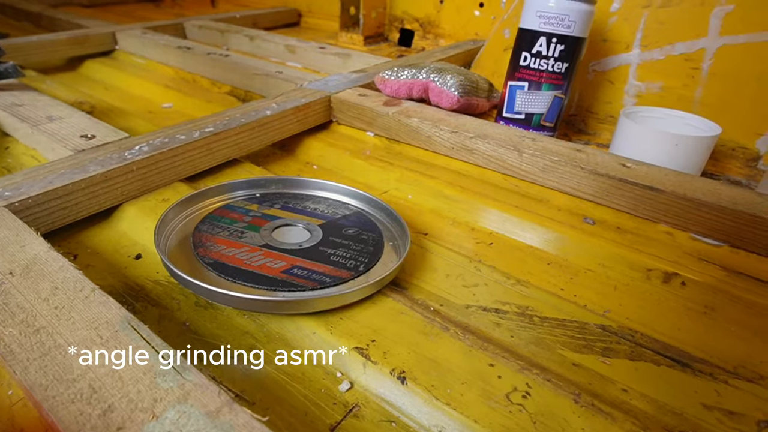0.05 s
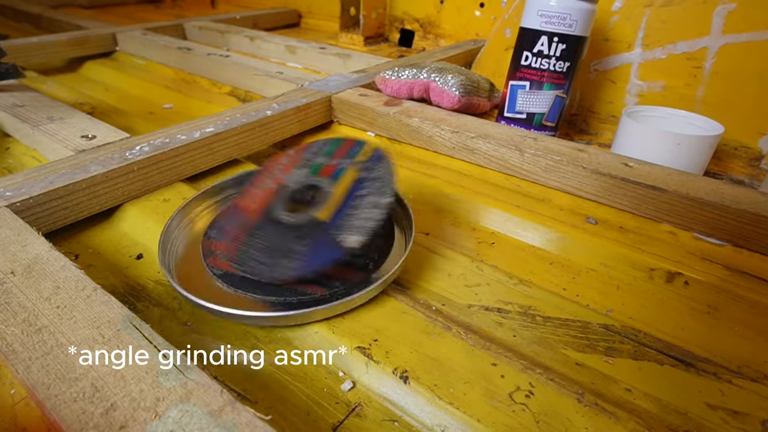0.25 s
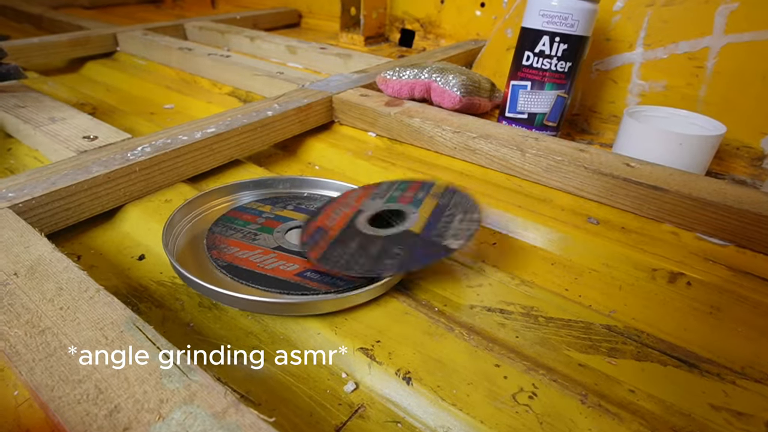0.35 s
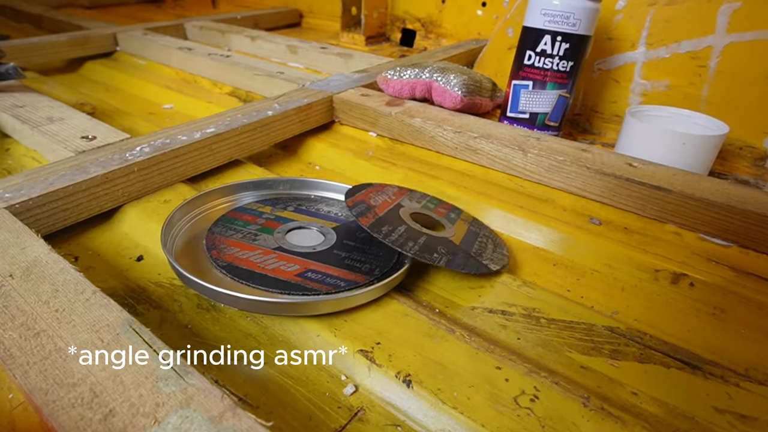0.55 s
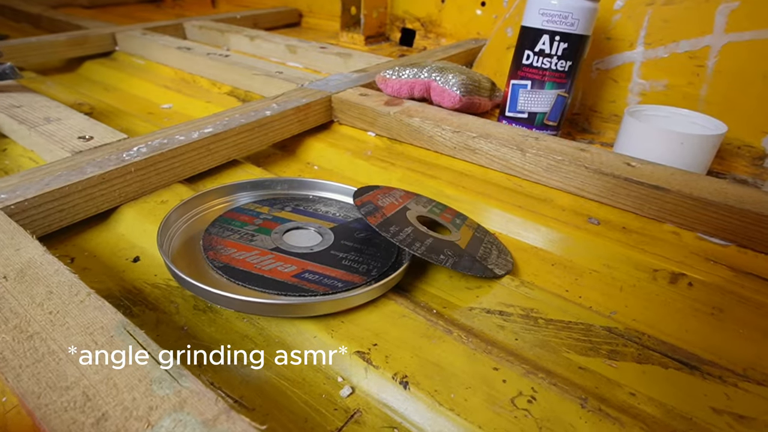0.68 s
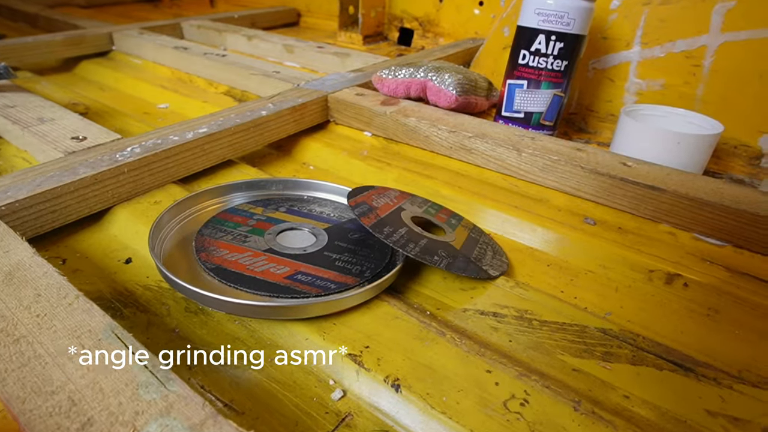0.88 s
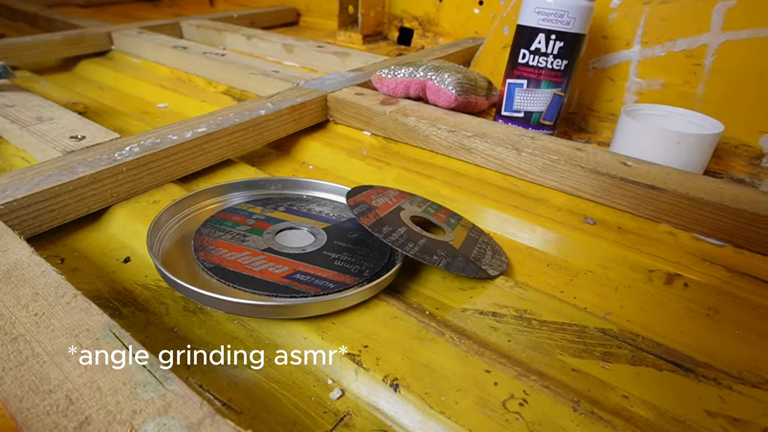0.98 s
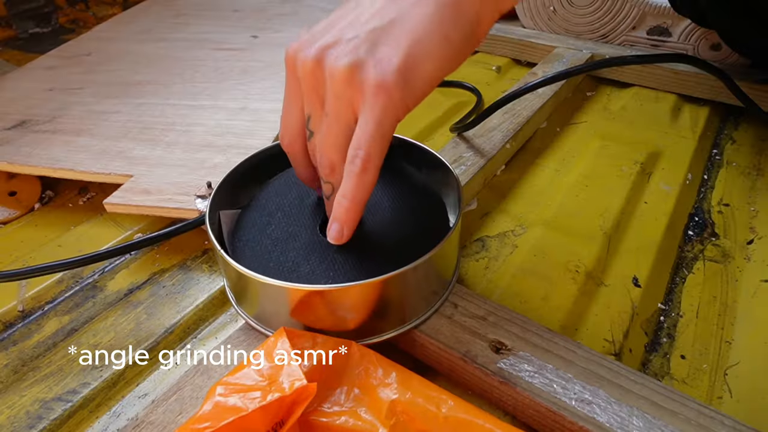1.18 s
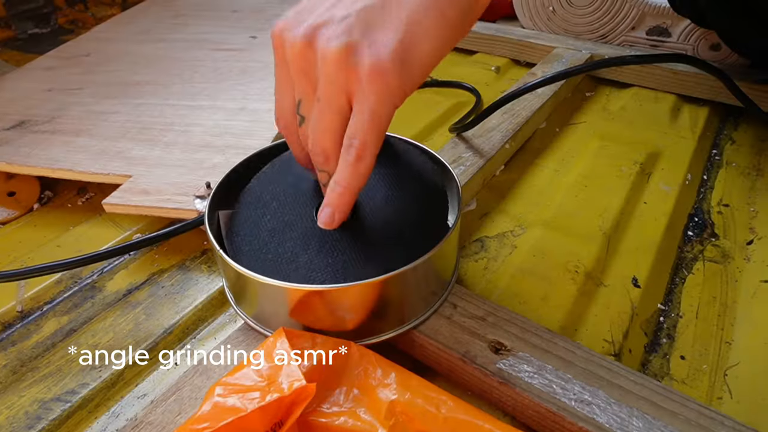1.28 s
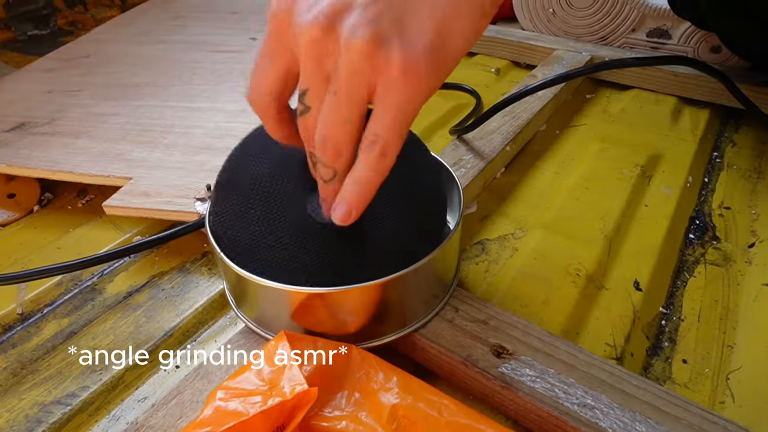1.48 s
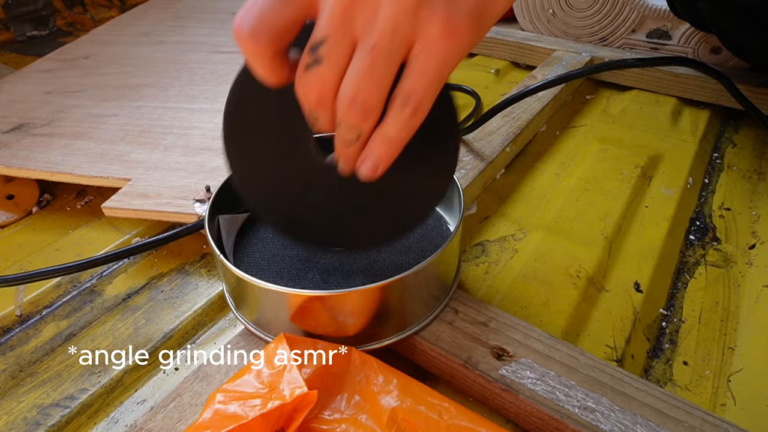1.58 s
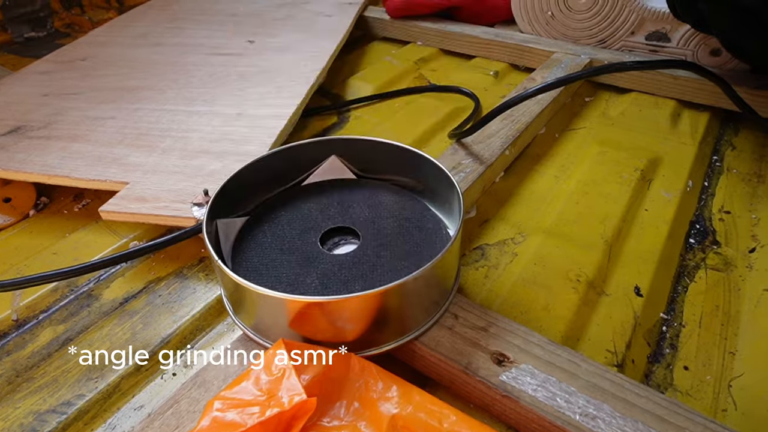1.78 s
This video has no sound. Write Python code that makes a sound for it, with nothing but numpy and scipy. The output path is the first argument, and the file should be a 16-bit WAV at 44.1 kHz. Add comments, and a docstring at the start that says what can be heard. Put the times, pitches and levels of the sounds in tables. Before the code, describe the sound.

Metallic clatter of a disc bouncing on a tin lid, followed by clacks and knocks.

```python
"""Grinding discs and tins in a van

Inside the van, microphone close. A grinding disc lands on a tin lid, bounces and rattles to rest on the
metal floor. After a soft scuff a hand works another disc in a deep tin: its rim squeaks along the wall,
it clacks down, and the tin knocks on a wooden batten. Low rumble and hiss lie behind it all.
The microphone's limiter flattens the hardest blows."""
import sys
import numpy as np
from scipy import signal
from scipy.fft import rfft, irfft, next_fast_len
from scipy.io import wavfile
from scipy.ndimage import map_coordinates

SR = 44100
rng = np.random.default_rng(int(sys.argv[2]) if len(sys.argv) > 2 else 0)


def int16_out(signal):
    """Quantize to a 16-bit WAV file."""
    q = np.round(np.clip(np.atleast_2d(signal).T, -1, 1) * 32767)
    wavfile.write(sys.argv[1], SR, q.astype(np.int16))


N = 81585
AGE = np.arange(SR // 2) / SR  # seconds since a contact

# the disc's contacts with the lid (t/s, ring level/dB, crack level/dB, tilt/dB per octave)
LID_CONTACTS = [(0.2147, -37, -5, 1), (0.223, -10.5, -17, 6), (0.2284, -7.5, 1.5, 4), (.239, -9.5, -12, -3),
                (.255, -8.5, -5, -3.5), (.266, -10, -18, 3.5), (.277, -12, -16, -4.5), (.29, -15, -7, 0),
                (0.3149, -12, -4.5, 0), (0.3392, -10.5, -3.5, 0.5), (.354, -16.5, -18.5, 4.5),
                (0.369, -14.5, -6.5, 0.5), (.376, -12.5, -13, 0.5), (.390, -13, -17, 1),
                (0.4025, -13.5, -7.5, 1), (.411, -13.5, -12.5, -4.5), (0.4244, -14, -13.5, 0),
                (.439, -12, -12, -2), (0.4602, -22, -5, -1.5), (.4725, -14, -7, -2), (.486, -27, -18, -4),
                (.5081, -13.5, -7, -1), (.520, -13.5, -12, -4), (.542, -16, -9.5, 1),
                (.553, -16, -8.5, -3.5), (.559, -13.5, -8.5, -3), (0.5763, -11.5, -14, -2),
                (.589, -16.5, -12.5, 0), (.597, -20.5, -7.5, -5.5), (.610, -19, -18, -13),
                (.645, -20, -25, -0.5), (.6536, -10, -4, -2), (.674, -26.5, -32, -6),
                (.692, -17, -12.5, -6.5), (.709, -27.5, -14.5, -6.5), (.724, -28.5, -30, -9)]
# crowded modes of lid and floor, heard close (f/Hz, level/dB)
LID_SPECTRUM = [(50, -47), (90, -24), (170, -32), (250, -10.5), (320, -24), (570, -3), (850, -7),
                (1050, -7), (1400, 0), (1980, -1), (2330, -4), (3600, -9), (5000, -14), (6500, -21.5),
                (8300, -20), (10300, -32.5), (14000, -25.5), (16000, -37)]
# how long they ring (f/Hz, t60/s)
LID_RING_TIMES = [(200, 0.41), (600, 0.19), (1800, 0.18), (5000, 0.18), (14000, 0.24)]
# the lid's clearest modes (f/Hz, level/dB, t60/s)
LID_TONES = [(519, -21, 0.19), (594.5, -18, 0.18), (850, -22, 0.072), (931, -18, 0.11), (1299, -14, 0.19),
             (1407, -12.5, 0.19), (1518, -24, 0.23), (1562, -15, 0.24), (1754, -27, 0.2),
             (1930, -11.5, 0.24), (2036, -12, 0.2), (2210, -21, .17), (2400, -23, 0.17),
             (3596, -17.5, 0.21), (4740, -21, .24)]
# a hard edge gives little bass (f/Hz, level/dB)
CRACK_BASS_CUT = [(60, -18), (300, -15.5), (900, -2)]
# the disc bounces clear (t/s, level/dB)
DISC_BOUNCES = [(0.215, -4), (0.3161, -3.5)]
# its free modes (f/Hz, level/dB, t60/s)
DISC_TONES = [(260, -13, 0.038), (1380, -20, 0.023), (1955, 1.5, 0.085), (2600, -30, 0.046),
              (3900, -2, 0.0087), (5250, -1.5, 0.0076), (8260, -8, 0.0055)]


def disc_on_lid():
    """Each contact cracks and rings the lid; on the first bounces the disc itself rings."""
    out = np.zeros(N)
    lid_colour = overlay(LID_SPECTRUM, mode_ripple(depth_db=3, spacing_hz=55.37))
    edge_colour = overlay(LID_SPECTRUM, CRACK_BASS_CUT)
    for start, ring_db, crack_db, slope_db in LID_CONTACTS:
        spot = mode_ripple(depth_db=3.5, spacing_hz=380)  # each point of contact favours its own modes
        crack = noise(overlay(edge_colour, spot), slope_db + 1)
        crack *= stroke(length=0.0018, rise=0.00031, t60=0.013)
        crowd = crowded_modes(overlay(lid_colour, spot), LID_RING_TIMES, slope_db)
        polarity = rng.choice([-1, 1])
        # the disc's weight shifts the modes from blow to blow
        tones = ring(LID_TONES, slope_db, scatter_db=4, detune_hz=14)
        add(out, start, amp(crack_db) * crack + amp(ring_db) * (crowd + polarity * tones))
    for start, db in DISC_BOUNCES:
        add(out, start, amp(db) * ring(DISC_TONES, scatter_db=3))
    # cut the low thump of the abrupt onsets, keeping the rattle light
    low_cut = signal.butter(2, 137, "highpass", fs=SR, output="sos")
    return signal.sosfilt(low_cut, out)


# the disc clacks in the deep tin (t/s, level/dB, tilt/dB per octave, t60/s)
TIN_CLACKS = [(1.169, -31.5, 4, 0.022), (1.225, -22.5, 4, 0.0083), (1.250, -25, 8.5, 0.047),
              (1.277, -24.5, 8.5, 0.089), (1.3779, -3.5, 2, 0.024), (1.384, -13, 1.5, 0.22),
              (1.393, -34, -3, 0.07), (1.4887, -15, 4, 0.052), (1.5476, -13, 4, 0.018),
              (1.557, -17, -2, 0.06), (1.572, -21, 1.5, 0.066), (1.683, -43.5, 7, 0.088),
              (1.743, -43, 3.5, 0.081)]
# a clack at close range (f/Hz, level/dB)
CLACK_SPECTRUM = [(150, -13), (600, -7), (1100, -10), (1500, -4), (2000, -3.5), (3200, 2), (4200, -7),
                  (6000, -12), (7800, -10), (10000, -22.5), (16000, -28)]
# nudges that set the tin ringing (t/s, level/dB)
TIN_NUDGES = [(1.13, -48.5), (1.28, -27.5), (1.378, -37.5), (1.577, -43)]
# the tin's ring (f/Hz, level/dB, t60/s)
TIN_TONES = [(1156, -4.5, 0.57), (1314, -2.5, 0.61), (1494, -2.5, 0.59), (1690, -2, 0.36), (1852, 0, 0.29)]
# the tin knocks on the batten (t/s, level/dB)
BATTEN_KNOCKS = [(1.279, -23.5), (1.395, -27.5), (1.408, -16.5), (1.491, -16), (1.5109, -28.5),
                 (1.534, -18.5)]
# tin against wood (f/Hz, level/dB)
KNOCK_SPECTRUM = [(60, -24), (200, -5), (330, -5.5), (430, -2), (560, -7), (760, 0), (930, -2), (1120, -3),
                  (1900, -16), (5000, -22.5), (16000, -47)]
# how long a knock rings (f/Hz, t60/s)
KNOCK_RING_TIMES = [(200, 0.42), (800, 0.14), (4000, 0.28)]
# the tin's hollow body (f/Hz, level/dB, t60/s)
HOLLOW_TONES = [(742.5, -1.5, 0.078), (1110, -0.5, 0.073)]


def deep_tin():
    """The disc clacks hard in the tin, which rings when nudged and knocks dully on the wood."""
    out = np.zeros(N)
    clack_colour = overlay(CLACK_SPECTRUM, mode_ripple(depth_db=3.5, spacing_hz=129))
    for start, db, slope_db, t60 in TIN_CLACKS:
        add(out, start, amp(db) * noise(clack_colour, slope_db) * fade(t60))
    for start, db in TIN_NUDGES:  # the hand keeps disturbing the ring
        add(out, start, amp(db) * ring(TIN_TONES, scatter_db=4, rough_rad=0.96))
    for start, db in BATTEN_KNOCKS:
        knock = crowded_modes(KNOCK_SPECTRUM, KNOCK_RING_TIMES) + ring(HOLLOW_TONES)
        add(out, start, amp(db) * knock)
    return out


# a disc's rim catches the metal (t/s, level/dB, f/Hz, t60/s)
RIM_CHINKS = [(.376, -19, 2730, .12), (0.447, -18, 4800, 0.099), (0.507, -20, 4250, .05),
              (.542, -11, 2830, 0.055), (0.6545, -22, 5410, .04), (0.708, -17.5, 2750, 0.037),
              (1.2646, -19.5, 3020, 0.04), (1.378, 0.5, 3140, 0.014), (1.38, -21, 3250, 0.17),
              (1.492, -8, 5350, 0.033), (1.5475, -21, 7060, .03)]


def rim_chinks():
    """A glancing touch of the rim makes one mode sing out, brief and bright."""
    out = np.zeros(N)
    for start, db, hz, t60 in RIM_CHINKS:
        add(out, start, ring([(hz, db, t60)], scatter_db=0))
    return out


# the rim sticks and slips on the tin's wall (t/s, length/s, level/dB, f/Hz)
RIM_SLIPS = [(1.23, 0.017, -30, 1584), (1.2472, 0.0061, -14, 1515), (1.2627, 0.0054, -17.5, 1505),
             (1.271, 0.0057, -18.5, 1460), (1.368, 0.0024, -44, 1500), (1.372, 0.0033, -27, 1490),
             (1.389, 0.016, -20, 1420), (1.490, 0.0059, -13.5, 1528), (1.5347, 0.0038, -9.5, 1483),
             (1.547, 0.011, -10, 1555), (1.563, 0.0057, -9.5, 1567), (1.573, 0.0043, -10.5, 1574),
             (1.652, 0.0077, -33.5, 1540), (1.683, 0.0066, -27, 1635), (1.743, 0.0085, -37.5, 1590)]
# partials of a squeak (ratio to f, level/dB)
SLIP_PARTIALS = [(.71, -11), (1, 3), (1.35, -12.5), (2.02, -14.5), (2.27, -18), (2.65, -13.5), (5.2, -20.5)]


def rim_squeaks():
    """Friction drives the disc's modes in short rough bursts; the tin rings on faintly."""
    out = np.zeros(N)
    for start, length, db, hz in RIM_SLIPS:
        tone = np.zeros(len(AGE))
        for ratio, partial_db in SLIP_PARTIALS:
            phase = 2 * np.pi * hz * AGE + 0.49 * wobble(per_s=460)
            tone += amp(partial_db) * np.sin(ratio * phase)
        burst = stroke(length, rise=0.00071, t60=0.0077)
        tin_tail = amp(-21) * stroke(length, rise=length, t60=0.19)
        add(out, start, amp(db) * unit(tone) * (burst + tin_tail))
    return out


# booms of the van's floor (t/s, level/dB, f/Hz, t60/s)
FLOOR_THUDS = [(.217, -26, 254, 0.12), (0.246, -18, 255, .12), (0.291, -19.5, 204.4, 0.11),
               (0.331, -29.5, 107, 0.13), (0.4722, -23.5, 246, 0.18), (.52, -18.5, 589, 0.17),
               (.559, -27, 269, 0.29), (.5764, -21, 590, 0.11), (.645, -21.5, 488, 0.22),
               (0.6539, -27, 267.6, 0.34), (.709, -28, 244.6, 0.24), (1.282, -18, 130, 0.13),
               (1.386, -28, 130, 0.15), (1.419, -26, 206.5, 0.3), (1.491, -14.5, 157.5, 0.12),
               (1.499, -25, 199, 0.47), (1.615, -20, 62, 0.077), (1.742, -17.5, 80, 0.037),
               (1.742, -33.5, 195, 0.078)]


def floor_thuds(rise_s=0.0009):
    """The floor panel booms softly under the blows, one mode to a thud."""
    out = np.zeros(N)
    onset = 1 - np.exp(-AGE / rise_s)
    for start, db, hz, t60 in FLOOR_THUDS:
        add(out, start, ring([(hz, db, t60)], scatter_db=0.5) * onset)
    return out


# the disc slides under the hand (t/s, length/s, level/dB, tilt/dB per octave)
DISC_SLIDES = [(1.121, 0.021, -32, -0.5), (1.143, 0.029, -36.5, 1.5), (1.196, 0.122, -40, -0.5)]
# the sliding, faint even this close (f/Hz, level/dB)
SLIDE_SPECTRUM = [(59, -61), (100, -7), (365, 0), (442, 2), (705, -4.5), (836, -12.5), (1610, -1),
                  (1830, -11), (3470, -15), (10500, -19.5), (13500, -11), (16000, -38)]


def disc_scuffs(grain_db=2.5):
    """Sliding gives a soft noise, grainy because its level flickers."""
    out = np.zeros(N)
    for start, length, db, slope_db in DISC_SLIDES:
        grains = unit(noise(SLIDE_SPECTRUM, slope_db) * amp(grain_db * wobble(per_s=304)))
        add(out, start, amp(db) * grains * stroke(length, rise=0.0059, t60=0.06))
    return out


# room tone inside the van (f/Hz, level/dB)
VAN_SPECTRUM = [(12, -0.5), (20, -7), (53, -5), (91, -16.5), (485, -27.5), (660, -25), (802, -29.5),
                (1120, -26), (1570, -24.5), (2390, -29), (4180, -35.5), (5680, -36), (16000, -41.5)]


def van_air():
    """Steady low rumble and hiss around the microphone."""
    return amp(-42.5) * noise(VAN_SPECTRUM, size=N)


def amp(db):
    """Decibels to gain."""
    return 10 ** (np.asarray(db) / 20)


def unit(x):
    """Scale to rms 1."""
    return x / np.sqrt(np.mean(x ** 2) + 1e-20)


def along(points, hz):
    """Interpolate (f/Hz, value) points on a log frequency axis."""
    freqs, values = np.transpose(points)
    return np.interp(np.log(hz + 1), np.log(freqs + 1), values)


def fade(t60):
    """Exponential decay from the moment of contact."""
    return amp(-60 * AGE / t60)


def stroke(length, rise, t60):
    """Rise, hold until length, then die away; all in seconds."""
    return np.minimum(AGE / rise, 1) * amp(-60 * np.maximum(AGE - length, 0) / t60)


def random_curve(positions):
    """A smooth curve through random knots, one at each whole number."""
    return map_coordinates(rng.standard_normal(2048), [positions], mode="wrap")


def wobble(per_s):
    """A smooth random wander in time, per_s knots a second."""
    return random_curve(AGE * per_s)


def add(track, start, sound):
    """Mix a sound in at start seconds."""
    part = track[round(start * SR):][:len(sound)]
    part += sound[:len(part)]


def tilt(hz, slope_db):
    """Gain that brightens or dulls by slope_db per octave above the low mids."""
    return amp(slope_db * np.log2(np.clip(hz, 900, 10000) / 2000))


def noise(colour, slope_db=0, size=len(AGE)):
    """Coloured noise of rms 1."""
    hz = np.fft.rfftfreq(size, 1 / SR)
    white = rfft(rng.standard_normal(size))
    return unit(irfft(white * amp(along(colour, hz)) * tilt(hz, slope_db), size))


def mode_ripple(depth_db, spacing_hz):
    """Irregular peaks and valleys of crowded modes, shallower in the bass (f/Hz, level/dB)."""
    hz = np.arange(0, SR / 2, spacing_hz / 4)
    ripple = np.clip(random_curve(hz / spacing_hz), -1.6, 1.6)
    return np.c_[hz, depth_db * ripple * np.minimum(hz / 2500, 1)]


def overlay(colour, detail):
    """Sum two (f/Hz, level/dB) curves."""
    hz = np.union1d(np.transpose(colour)[0], np.transpose(detail)[0])
    return np.c_[hz, along(colour, hz) + along(detail, hz)]


def crowded_modes(colour, ring_times, slope_db=0):
    """Modes so dense that they blur into noise, each band dying at its own speed."""
    spectrum = rfft(noise(colour, slope_db))
    hz = np.fft.rfftfreq(len(AGE), 1 / SR)
    centres, t60s = np.transpose(ring_times)
    out = np.zeros(len(AGE))
    for weights, t60 in zip(np.eye(len(centres)), t60s):
        band = along(np.c_[centres, weights], hz)
        out += irfft(spectrum * band, len(AGE)) * fade(t60)
    return out


def ring(modes, slope_db=0, scatter_db=2, rough_rad=0, detune_hz=0):
    """Single modes, struck differently each time; rough_rad blurs their pitch, detune_hz shifts it."""
    out = np.zeros(len(AGE))
    for hz, db, t60 in modes:
        gain = amp(db + scatter_db * rng.standard_normal()) * tilt(hz, slope_db)
        phase = 2 * np.pi * (hz + detune_hz * rng.standard_normal()) * AGE
        if rough_rad:
            phase += rough_rad * wobble(per_s=102)
        out += gain * fade(t60) * np.sin(phase)
    return out


def scene():
    """The handling at one close microphone, over the van's room tone."""
    handling = disc_on_lid() + deep_tin() + rim_chinks() + floor_thuds() + rim_squeaks() + disc_scuffs()
    return (handling + van_air())[None]


def record(dry):
    """The microphone's limiter ducks after hard blows; soft saturation and a treble cut follow."""
    ceiling, attack_s, release_db_per_s, top_hz = 1.19, 0.001, 151, 16100
    over_db = 20 * np.log10(np.maximum(1, np.abs(dry) / ceiling))
    recovery_db = release_db_per_s * np.arange(N) / SR
    duck_db = np.maximum.accumulate(over_db + recovery_db, axis=-1) - recovery_db
    lag = np.exp(-1 / (attack_s * SR))
    limited = dry * amp(-signal.lfilter([1 - lag], [1, -lag], duck_db))
    saturated = limited / (1 + limited ** 4) ** (1 / 4)
    size = next_fast_len(N + SR // 2)
    passband = np.fft.rfftfreq(size, 1 / SR) < top_hz
    return irfft(rfft(saturated, size) * passband, size)[:, :N]


dry = scene()
out = record(dry)
int16_out(out)
```